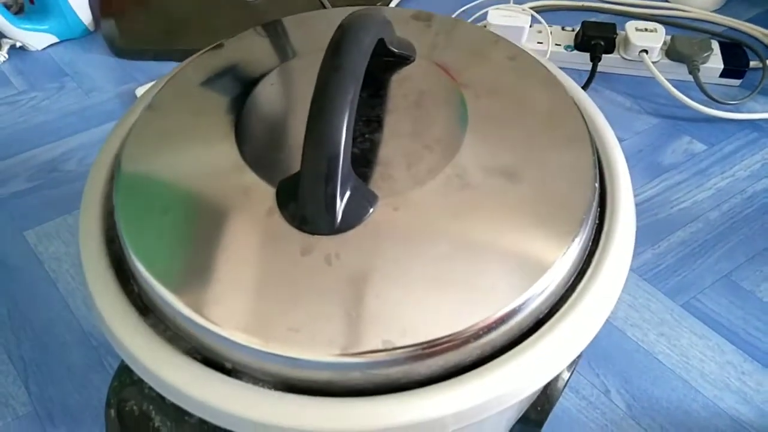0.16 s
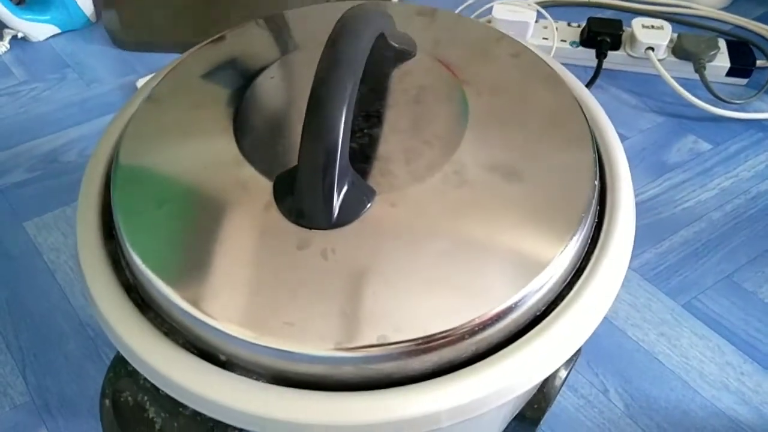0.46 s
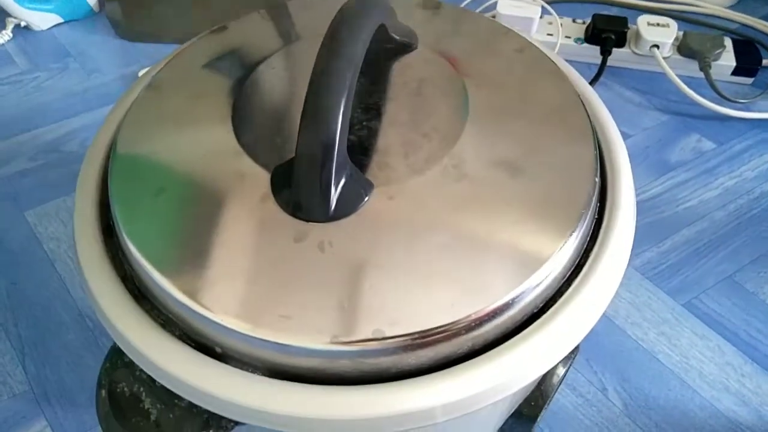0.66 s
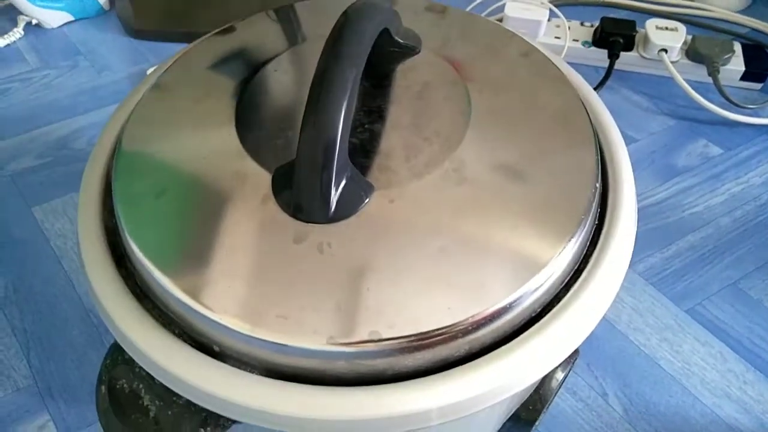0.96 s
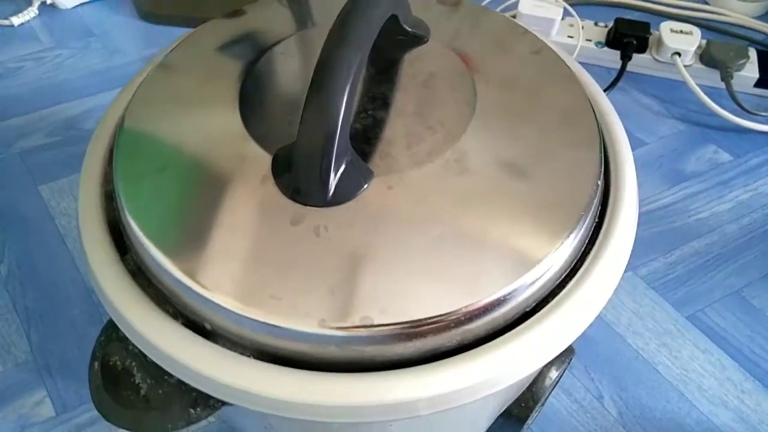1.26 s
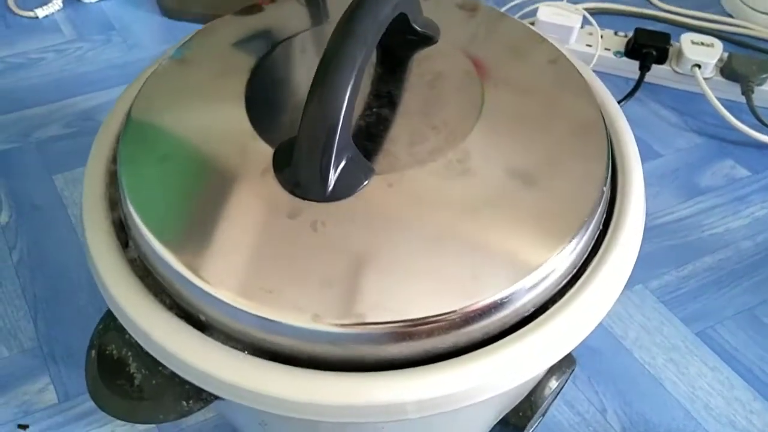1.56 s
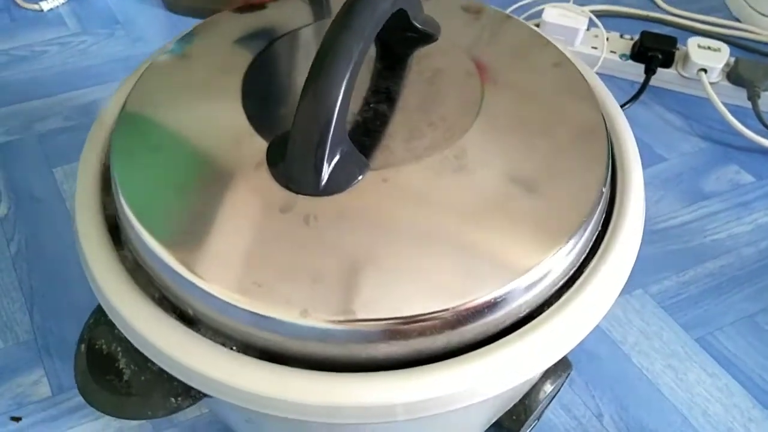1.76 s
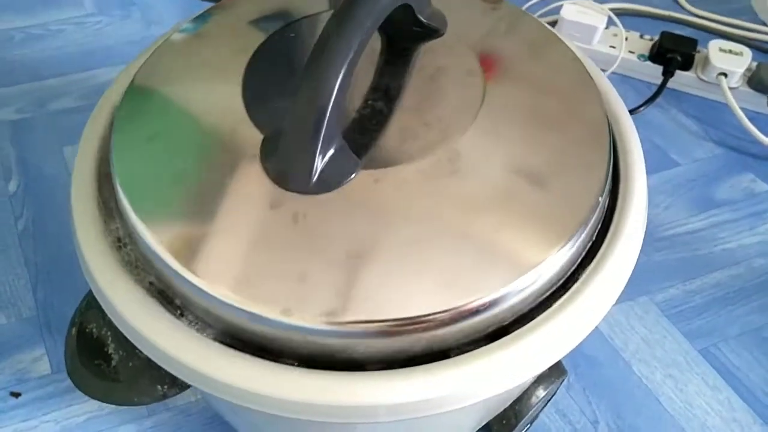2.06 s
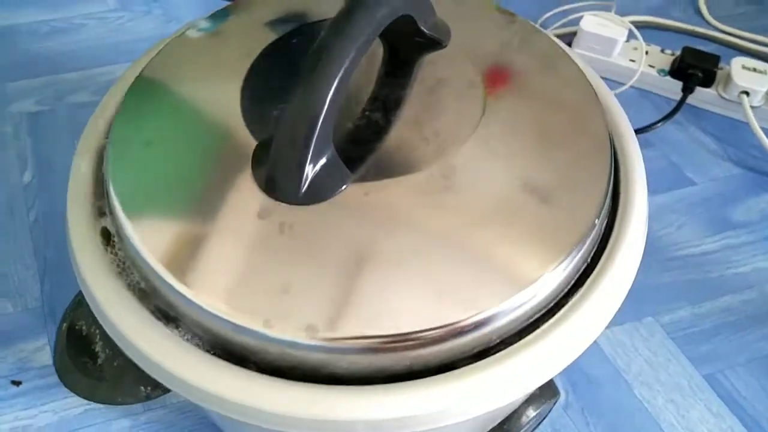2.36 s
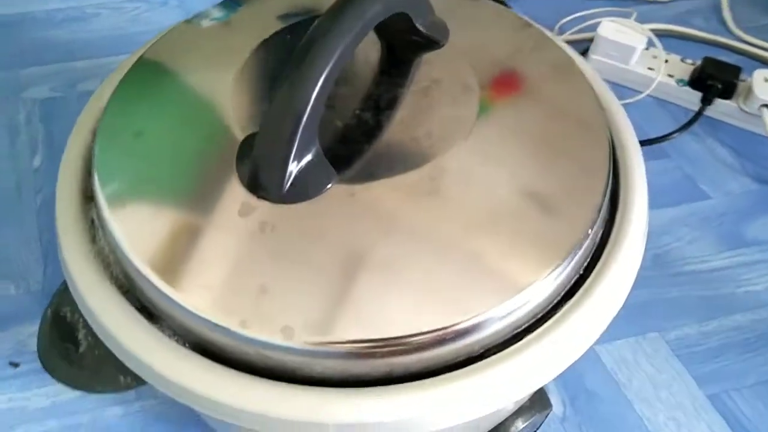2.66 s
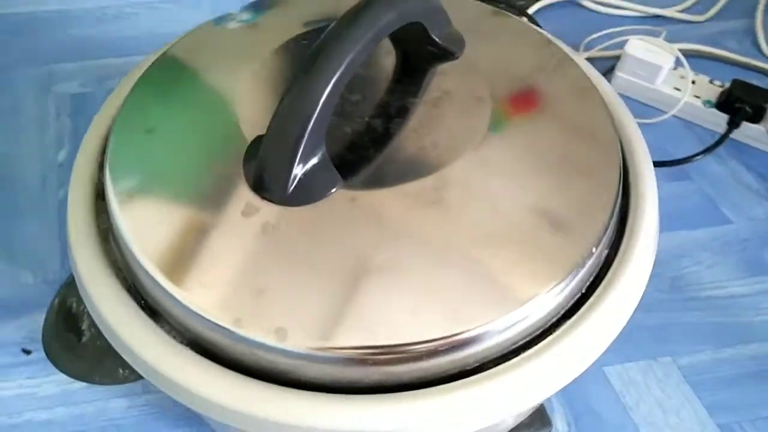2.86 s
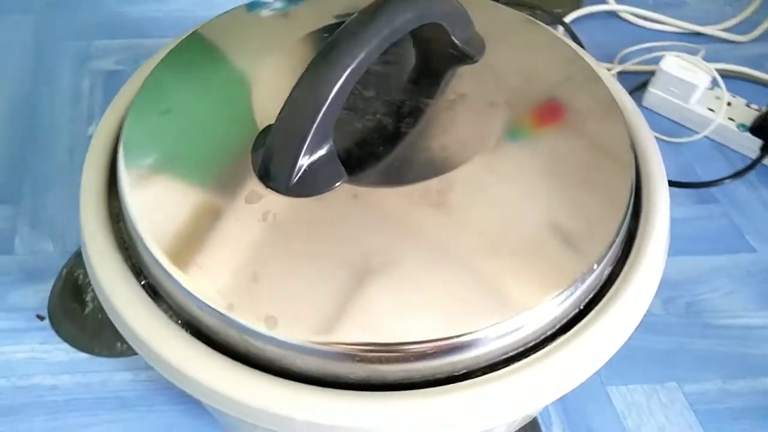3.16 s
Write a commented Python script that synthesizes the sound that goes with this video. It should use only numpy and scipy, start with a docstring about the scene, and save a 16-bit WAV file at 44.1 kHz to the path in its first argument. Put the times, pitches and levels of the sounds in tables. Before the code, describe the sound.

A loose metal lid ticks irregularly on a boiling rice cooker, close to a phone, over steady low rumble, wavering hum and soft muffled bubbling. Small ticks at 0.3 and 0.9 s; a clear watery plop near 1.8 s as ticks crowd together. A dull bump at 2.0 s leads to the loudest ringing clank at 2.1 s, another at 2.26, a short steam hiss around 2.45, then sparser ticks, one brighter at 2.8.

```python
"""A metal lid ticks, once clanks and rings over bubbling, brief hisses of steam and a rumble with a wavering hum.
A rice cooker boils close to a phone: steam lifts the loose lid, whose blows on the rim feed damped modes.
Hard contacts add dense, patchy treble. Bubbles are short rising sines, and some single tones ring clearly.
Steam and rumble are coloured noise; the hum is noise through narrow resonances, and the pot bumps once."""
import sys
import numpy as np
from scipy import signal
from scipy.fft import rfft, irfft
from scipy.io import wavfile
from scipy.ndimage import uniform_filter1d

SR = 44100
rng = np.random.default_rng(int(sys.argv[2]) if len(sys.argv) > 2 else 0)


def gain_from_db(level_db):
    """Turn a decibel level (scalar or array-like) into a linear amplitude factor."""
    decades = np.asarray(level_db, float) / 20
    return 10 ** decades


def pcm_store(signal):
    """Save signal as 16-bit PCM."""
    levels = np.round(np.clip(np.atleast_2d(signal), -1, 1) * 32767)
    wavfile.write(sys.argv[1], SR, levels.astype(np.int16).T)


N = 145530

# how hard it boils: (time [s], level [dB])
BOIL_CURVE = [(0.0, -53.5), (0.33, -62), (0.47, -67), (1.25, -56.5), (1.37, -57.5), (1.75, -56.5),
              (1.9, -57), (2.24, -44), (2.35, -42), (2.94, -57.5), (3.2, -54.5), (3.3, -64)]
# narrow slices of treble come and go on their own: depth, and new levels per second
PATCH_DB, PATCHES_PER_S = 3.5, 18


def level(x, db=0):
    """Scale to an rms level."""
    return x * gain_from_db(db) / np.sqrt(np.mean(x ** 2))


def curve(rows, col=1):
    """A table column joined over time."""
    rows = np.array(rows)
    return np.interp(np.arange(N) / SR, rows[:, 0], rows[:, col])


def gain_at(points, hz):
    """Gain of a spectrum table, joined over log frequency; -120 dB outside it."""
    p = np.array(points)
    return gain_from_db(np.interp(np.log(hz + 1), np.log(p[:, 0]), p[:, 1], left=-120, right=-120))


def coloured(points):
    """Noise of rms 1 with the given spectrum."""
    spectrum = rfft(rng.standard_normal(N))
    return level(irfft(spectrum * gain_at(points, np.fft.rfftfreq(N, 1 / SR)), N))


def walk(rate):
    """Random levels held 1 / rate s and slewed twice."""
    k = int(SR / rate)
    steps = np.repeat(rng.standard_normal(N // k + 1), k)
    return 1.3 * uniform_filter1d(uniform_filter1d(steps, k), k)[:N]


def filtered(x, order, hz, kind):
    """Butterworth filter."""
    return signal.sosfilt(signal.butter(order, hz, kind, fs=SR, output="sos"), x)


def ring(x, hz, t60):
    """One damped mode, driven by x."""
    pole = np.exp(2j * np.pi * hz / SR - np.log(1000) / (t60 * SR))
    return signal.lfilter([1], [1, -pole], x).imag


def fade(at, db, t60):
    """Envelope that jumps at each blow and dies away."""
    return signal.lfilter([1], [1, -1000 ** (-1 / (t60 * SR))], np.bincount(at, gain_from_db(db), N)[:N])


def rumble():
    """Boiling rumble: low coloured noise whose level wanders."""
    # rumble spectrum: (frequency [Hz], relative level [dB])
    spectrum = [(13, -35), (22, -21), (41, -8), (107, 0.5), (128, -4.5), (145, -18), (158, -5.5), (177, -5),
                (247, -9), (420, -25), (550, -30.5), (920, -120)]
    return coloured(spectrum) * gain_from_db(-42.5 + 2.68 * walk(9.03))


def hum():
    """Wavering hum lines: noise through narrow resonances; the top line weakens late on."""
    # hum lines: (frequency [Hz], bandwidth [Hz], rms level before fade and swell [dB])
    lines = [(57.3, 5.8, -51.5), (101.3, 15.6, -48), (120.7, 11.1, -48.5), (175.8, 3.15, -47)]
    fade_s, fade_db = 2.31, -10
    out = 0
    for hz, width, db in lines:
        line = level(ring(rng.standard_normal(N), hz, np.log(1000) / (np.pi * width)), db)
        if hz > 150:
            line = line * gain_from_db(curve([(fade_s, 0), (fade_s + 0.17, fade_db)]))
        out = out + line
    return out


def pot():
    """Rumble and hum swelling together."""
    # swell of the pot, used about its mean: (time [s], level [dB])
    swell_curve = [(0.0, -41), (1.69, -41), (1.79, -38.5), (1.96, -39.5), (1.99, -35), (2.21, -42),
                   (2.6, -39.5), (3.3, -41)]
    swell = curve(swell_curve)
    return (rumble() + hum()) * gain_from_db(swell - swell.mean())


def background():
    """Steady coloured noise underneath."""
    # background spectrum: (frequency [Hz], relative level [dB])
    spectrum = [(210, -8), (350, -12), (397, 0.5), (481, -12.5), (592, -13.5), (923, -22.5), (1830, -25.5),
                (2250, -23), (3570, -35.5), (5660, -33), (7900, -38.5), (12000, -38.5), (15700, -41)]
    return coloured(spectrum) * gain_from_db(-63.5)


def bubbles():
    """Short rising tones of bursting bubbles, muffled by the lid."""
    per_s, centre_hz, octaves = 150, 530, 0.596
    cycles_to_30db, glide = 31.5, 0.082  # each tone falls 30 dB over this many cycles
    c = rng.random((int(per_s * N / SR), 4))
    hz = centre_hz * 2 ** (octaves * 2 * (c[:, 1:2] + c[:, 2:3] - 1))
    turns = hz * np.arange(2048) / SR
    rising = np.sin(2 * np.pi * turns * (1 + glide * turns / cycles_to_30db))
    tone = rising * 1000 ** (-turns / cycles_to_30db / 2)
    # a few bubbles are much louder; each starts softly over one cycle
    tone = tone * gain_from_db(-3.0 * np.log(1 - c[:, 3:])) * np.minimum(turns, 1)
    where = (c[:, :1] * N).astype(int) + np.arange(2048)
    burst = np.bincount(where.ravel(), tone.ravel())[:N]
    return level(burst, -6.5) * gain_from_db(curve(BOIL_CURVE))


def blips():
    """Single clear tones with a soft start, wavering in pitch and level."""
    # bubbles or lone lid modes: (time [s], frequency [Hz], t60 [s], level before lift and dips [dB])
    tones = [(0.0, 1734, 0.16, -51.5), (.01, 643, .3, -51), (0.059, 953, 0.22, -55),
             (0.137, 1060, 0.13, -60), (0.184, 1010, 0.12, -63), (.275, 1590, 0.25, -58.5),
             (.337, 7190, 0.3, -68), (.338, 5200, 0.086, -67), (.5, 781, 0.29, -56),
             (0.062, 1500, 0.48, -45), (.21, 632, 0.61, -48), (.555, 1236, 0.21, -51.5),
             (0.686, 1437, 0.25, -56), (.78, 1500, 0.096, -53), (.805, 1950, 0.16, -57),
             (1.36, 410, 0.34, -46), (1.41, 617, .3, -54), (1.45, 1333, 0.092, -50),
             (1.505, 803, 0.57, -54), (1.62, 1043, 0.64, -56), (1.6, 2080, 0.29, -56),
             (1.79, 634.4, 0.37, -37.5), (1.84, 673, 0.44, -44), (2.64, 1008, 0.35, -51),
             (2.74, 4960, 0.29, -68), (2.779, 5630, 0.38, -64), (2.78, 7300, 0.29, -62.5),
             (2.79, 7000, 0.26, -66), (2.81, 6440, 0.18, -65), (2.868, 906, 0.062, -41),
             (3.047, 2310, 0.33, -60), (3.05, 807, 0.34, -55), (3.114, 1010, 0.11, -48),
             (3.07, 2070, 0.46, -54.5), (3.261, 923, 0.21, -55)]
    waver, lift_db, dip_db, rise_s = .018, 6.0, 8, 0.0072  # waver is a share of pitch
    out = np.zeros(N)
    for s, hz, t60, db in tones:
        at = int(s * SR)
        t = np.arange(min(SR // 2, N - at)) / SR
        pitch = hz * (1 + waver * min(1, 1500 / hz) * walk(32.0)[:len(t)])
        turns = np.cumsum(pitch) / SR
        loudness = gain_from_db(db + lift_db - dip_db * np.abs(walk(90.5)[:len(t)]))
        env = loudness * 1000 ** (-t / t60) * np.minimum(t / rise_s, 1)
        out[at:at + len(t)] += env * np.sin(2 * np.pi * turns)
    return out


def strike(modes, at, db, chatter_db):
    """Each blow shares its strength differently over the modes; a noisy rattle then feeds them too."""
    scatter_db, spread_s = 1.5, .0003  # a blow wakes the modes not quite together
    chatter_t60_s, cut_db, flutter_db = 0.4, -93.5, 2.5
    share = rng.standard_normal((len(at), len(modes)))
    late = rng.random((len(at), len(modes)))
    # a noisy rattle follows each blow; its weak tail is cut off below the cut level
    chatter = np.maximum(fade(at, db + chatter_db, chatter_t60_s) - gain_from_db(cut_db), 0)
    chatter = chatter * gain_from_db(flutter_db * walk(45.04))
    out = 0
    for k, (hz, mode_db, t60) in enumerate(modes):
        start = at + (late[:, k] * spread_s * SR).astype(int)
        push = np.bincount(start, gain_from_db(db + scatter_db * share[:, k]), N)[:N]
        out = out + gain_from_db(mode_db) * ring(push + chatter * rng.standard_normal(N), hz, t60)
    return out


def below_lid_top(x):
    """Keep the lid's lower modes: steep low-pass, 45 dB down from its stopband edge."""
    return signal.sosfilt(signal.cheby2(8, 45, 1931 * 1.235, fs=SR, output="sos"), x)


def lid_ticks():
    """The lid drops on the rim in ticks, with a faint random rattle that follows the boil."""
    # blows: (time [s], upper [dB], middle [dB], lower [dB], low modes [dB]), before the group trims
    blows = [(0.0611, -42.5, -39.5, -68, -42.5), (0.1277, -79, -47.5, -64, -38),
             (0.337, -27.5, -38, -28, -37.5), (0.37, -31.5, -34, -55, -49), (0.4794, -55, -62, -65, -45),
             (0.5637, -41.5, -50.5, -46, -60), (0.6874, -70, -55, -70, -43), (0.7794, -62, -57, -67, -50),
             (0.907, -27.5, -39, -29, -42.5), (0.9857, -31, -48, -38, -43.5), (1.278, -41, -75, -70, -51),
             (1.3495, -44, -56, -45, -61), (1.3953, -40, -54, -54, -44.5), (1.51, -67, -58, -58, -51),
             (1.539, -38.5, -49, -41, -42.5), (1.6087, -45.5, -73, -48, -52),
             (1.7043, -39.5, -57, -40, -40), (1.7199, -29, -40, -35.5, -37.5),
             (1.7784, -40, -51, -55.5, -33), (1.8383, -27.5, -34.5, -29.5, -30.5),
             (1.9187, -40, -53, -40, -36.5), (1.999, -31.5, -59, -34.5, -65), (2.0221, -32, -50, -33, -32),
             (2.072, -46, -62, -57, -69), (2.1092, -12.5, -38, -18.5, -22.5),
             (2.2612, -23.5, -41, -25.5, -33), (2.2895, -53, -35, -39, -46), (2.462, -30, -37, -43, -44),
             (2.5063, -33, -69, -41, -36.5), (2.6025, -41.5, -48, -65, -43.5),
             (2.7808, -27.5, -60, -28.5, -34.5), (2.8739, -42, -39, -63, -51),
             (2.963, -36, -50.5, -42, -48), (3.0648, -40, -75, -61, -70), (3.1284, -31, -50, -42.5, -53),
             (3.204, -57, -73, -67, -63)]
    # lid modes, from the top group down: (frequency [Hz], relative level [dB], t60 [s])
    upper = [(1834, -15.5, 0.42), (1757, -5, 0.16), (1706, 0, 0.12), (1746, 6, 0.086), (1781.5, 4, 0.094),
             (1784, -10, 0.033), (1840, -8, 0.22), (1950, -21.5, 0.16), (1950, -25, .1), (1990, -27, .1)]
    middle = [(1463, 4.5, 0.064), (1500, -9, 0.14), (1531, -7, 0.43), (1590, -30.5, .12)]
    lower = [(1086, -2.5, 0.025), (1174, -12, 0.16), (1232, -6, 0.091), (1295, -4, 0.1),
             (1351, -2.5, 0.062)]
    low = [(423.6, -10, 0.097), (473, -5, 0.054), (569, 4.5, 0.04), (632, -3, 0.12), (737, 1.5, 0.041),
           (816.4, -5.5, 0.15), (938, -0.5, 0.021)]
    # trim of the listed blows: (upper [dB], middle [dB], lower [dB], low [dB])
    group_db = (-13, -6.5, -10.5, -9)
    rattles_per_s, rattle_db, chatter_db = 34, -23, -28.5  # rattle is against the boil level
    rows = np.array(blows)
    at = (rows[:, 0] * SR).astype(int)
    small = rng.random((int(rattles_per_s * N / SR), 2))
    small_at = (small[:, 0] * N).astype(int)
    small_db = curve(BOIL_CURVE)[small_at] + rattle_db - 6.0 * np.log(1 - small[:, 1])
    both_at = np.r_[at, small_at]
    out = 0
    for k, modes in enumerate((upper, middle, lower, low)):
        both_db = np.r_[rows[:, k + 1] + group_db[k], small_db]
        group = strike(modes, both_at, both_db, chatter_db)
        out = out + filtered(group, 2, .75 * modes[0][0], "high")
    return below_lid_top(out)


def shimmer(at, columns, count=600):
    """Dense high modes in three ranges, set going by gritty, patchy contact."""
    # dense high modes: (frequency [Hz], relative level [dB])
    spectrum = [(1290, -42), (2200, 13.5), (2750, 1), (2910, -2.5), (3220, -5), (3370, -8), (3560, 2),
                (3900, -9), (4590, 5), (4960, -14), (5240, 5.5), (5700, -8), (6500, 5.5), (8400, -13),
                (11000, -15), (14000, -38)]
    # borders between the ranges: (low to middle [Hz], middle to high [Hz])
    split_hz = (5150, 7840)
    t60_s, tilt = 0.067, 0.25  # t60 at 5 kHz; higher modes die sooner
    # time constant of the grit, and the level below which the weak treble tail is cut off
    contact_s, cut_db = 0.078, -84.5
    uneven = .3  # dB of scatter for each dB that a contact is softer than the hardest
    hz = np.sort(rng.uniform(2200, 14000, count))[:, None]
    t = np.arange(SR // 6) / SR
    t60 = t60_s * (hz / 5000) ** -tilt
    tones = np.sin(2 * np.pi * (hz * t + rng.random((count, 1))))
    modes = gain_at(spectrum, hz) * tones * 1000 ** (-t / t60)
    # the ranges overlap
    group = np.searchsorted(split_hz, hz[:, 0] * np.exp(.06 * rng.standard_normal(count)))
    out = []
    for k, db in enumerate(columns):
        mine = modes[group == k]
        mine = mine / np.sqrt(np.sum(mine.sum(axis=0) ** 2))
        grit, total = rng.standard_normal(N), 0
        for part in np.array_split(mine, indices_or_sections=7):
            scatter = rng.standard_normal(len(db)).clip(-2, 1) - .5
            own = db + uneven * (db.max() - db) * scatter
            tail = np.maximum(fade(at, own, contact_s * np.log(1000)) - gain_from_db(cut_db), 0)
            env = tail + 4.1 * fade(at, own, 0.0023)  # a sharp click on top
            rung = signal.oaconvolve(env * grit, part.sum(axis=0))[:N]
            total = total + rung * gain_from_db(PATCH_DB * walk(PATCHES_PER_S))
        out.append(total)
    return filtered(np.array(out), 6, 2150, "high")


def hard_contacts():
    """Hard metal-on-metal contacts: long and high modes, then the shimmer in three ranges."""
    # contacts: (time [s], level near 6 kHz [dB], near 10 kHz [dB], near 3.5 kHz [dB])
    contacts = [(0.3366, -71, -65.5, -81), (0.9087, -79, -71, -95), (1.7224, -67.5, -71, -84),
                (1.838, -62, -70, -72), (2.0223, -69, -74, -86), (2.07, -75, -87, -87),
                (2.1095, -45, -55.5, -53), (2.2612, -54, -69.5, -64.5), (2.782, -68.5, -73.5, -82)]
    # long modes that only hard contacts wake: (frequency [Hz], relative level [dB], t60 [s])
    long_modes = [(1520, -1, 0.86), (804, -13.5, 1), (1240, -16, 0.48), (1736, -12.5, 0.55),
                  (1830, 3, 0.26)]
    # distinct high modes: (frequency [Hz], relative level [dB], t60 [s])
    high_modes = [(2410, -14, .2), (2420, 8, 0.11), (2690, -4, 0.28), (3430, -21, .2), (4100, -23, .2),
                  (4630, -16, .25), (5280, 0, .25), (5320, -7, .3), (5900, 3, .35), (5900, -8, .3),
                  (6300, 7, .25), (6700, -10, .25), (6934, -10, .25), (7300, 10, 0.12), (7472, -9, .2)]
    hard = np.array(contacts)
    at = (hard[:, 0] * SR).astype(int)
    sing = below_lid_top(strike(long_modes, at, hard[:, 1] + 18, chatter_db=-50))
    high = strike(high_modes, at, hard[:, 1] - 19, chatter_db=-16)
    high = filtered(high, 4, [2300, 8000], "band")
    return sing + high, shimmer(at, (hard[:, 3], hard[:, 1], hard[:, 2]))


def steam(count=16):
    """Puffs of hiss from under the rim, sputtering slice by slice."""
    # puffs: (start [s], rise [s], hold [s], fall [s], level before colour slices and lift [dB])
    puffs = [(1.594, 0.068, .03, .05, -77), (2.402, 0.041, 0.052, 0.11, -60)]
    # hiss spectrum: (frequency [Hz], relative level [dB])
    spectrum = [(2650, -79), (4500, -46), (5120, -17), (5660, -27), (5850, 4), (6180, 2), (7710, -6),
                (8180, -18), (10600, -7), (13500, -30)]
    t = np.arange(N) / SR
    env = 0
    for start, rise, hold, fall, db in puffs:
        corners = np.cumsum([start, rise, hold, fall])
        env = env + gain_from_db(db) * np.interp(t, corners, [0, 1, 1, 0])
    hiss, edges = coloured(spectrum), np.geomspace(4400, 14000, count + 1)
    out = 0
    for k in range(count):
        part = filtered(hiss, 2, edges[k:k + 2], "band")
        out = out + part * gain_from_db(PATCH_DB * walk(2 * PATCHES_PER_S) + 3.0)
    return env * out


def bump():
    """A dull bump of the pot: one low sine with a soft start, dying away."""
    # the bump: (time [s], frequency [Hz], t60 [s], level before the soft start and decay [dB])
    thump = (1.975, 80, .4, -23)
    s, hz, t60, db = thump
    t = np.maximum(np.arange(N) / SR - s, 0)
    env = 1000 ** (-t / t60) * np.minimum(t / 0.056, 1)
    return gain_from_db(db) * np.sin(2 * np.pi * hz * t) * env


def scene():
    """Everything in the middle; only the highest shimmer differs a little left and right."""
    boil = pot() + background() + bubbles() + blips()
    ticks = lid_ticks()
    rings, bright = hard_contacts()
    mid = boil + ticks + rings + bright.sum(axis=0) + steam() + bump()
    side = gain_from_db(-15.5) * np.roll(bright[2], 37)  # 37 samples late
    return np.array([mid + side, mid - side])


def top_cut(x):
    """Nothing passes above the cut-off."""
    return signal.sosfilt(signal.butter(12, 15810, fs=SR, output="sos"), x)


def record(dry):
    """The phone cuts the deepest bass, below 38 Hz."""
    mix = filtered(dry, 3, 38, "high")
    return top_cut(mix)


dry = scene()
out = record(dry)
pcm_store(out)
```